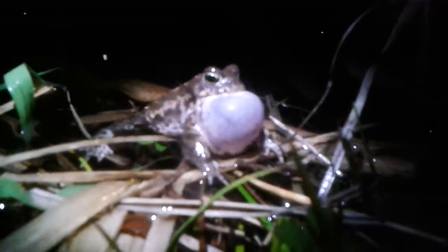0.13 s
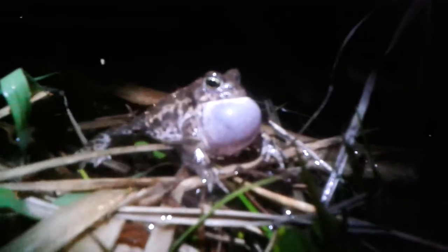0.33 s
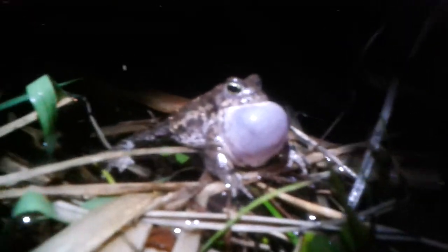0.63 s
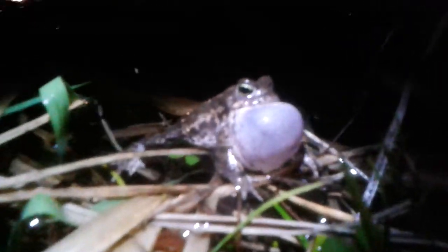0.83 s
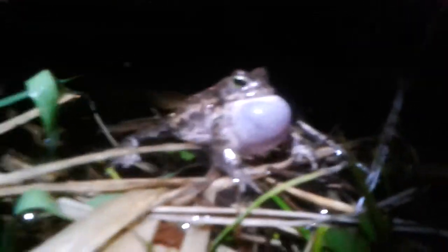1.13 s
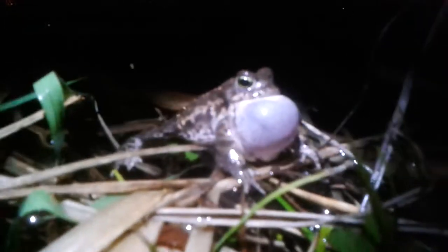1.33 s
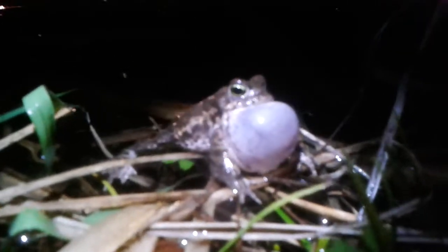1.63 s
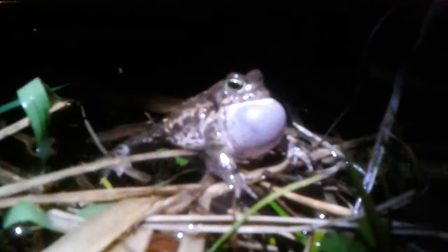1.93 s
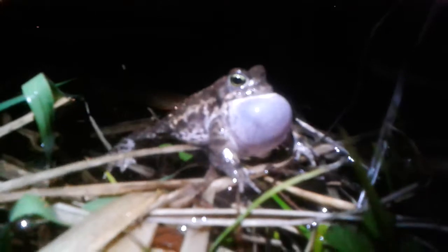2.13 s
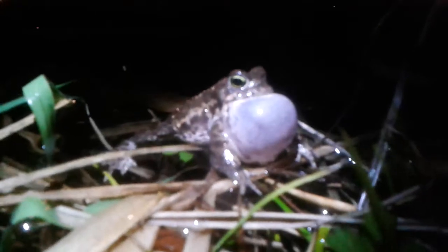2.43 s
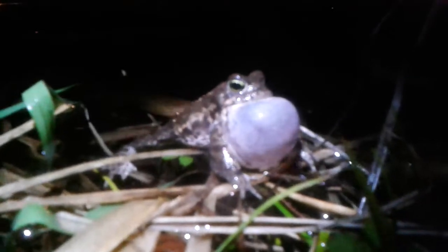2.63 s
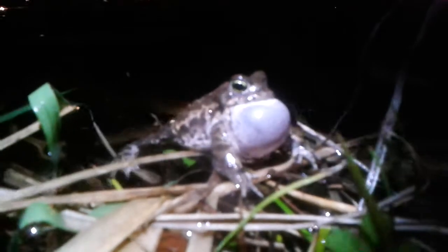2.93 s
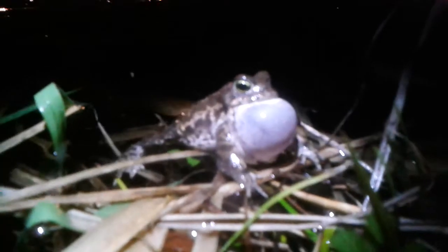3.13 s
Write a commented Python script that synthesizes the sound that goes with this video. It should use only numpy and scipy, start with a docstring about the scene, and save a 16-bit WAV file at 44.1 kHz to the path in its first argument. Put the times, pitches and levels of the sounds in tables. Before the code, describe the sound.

Toad calling in harsh, buzzing rattles very close by at night, with fainter toads filling the pauses.

```python
"""Night at a pond's edge: neighbouring toads call first, over a distant chorus, soft hiss and a faint tone.
Then a toad in the reeds rattles four trills, so close that each pulse overloads the microphone; the last
runs to the end. Every pulse rings its vocal sac, which tightens through a trill: higher, shorter rings.
Neighbours fill the pauses and overlap the trills, a few pulses turn reedy after each of the first three,
and small noise ticks are scattered early, around the first pause and before the last trill."""
import sys
import numpy as np
from scipy import signal
from scipy.fft import rfft, irfft
from scipy.io import wavfile
from scipy.ndimage import uniform_filter1d

SR = 44100
rng = np.random.default_rng(int(sys.argv[2]) if len(sys.argv) > 2 else 0)


def wav_out(sig):
    """Save sig, one row per channel (or a flat mono array), as 16-bit PCM at SR to the path in sys.argv[1]."""
    wavfile.write(sys.argv[1], SR, np.round(np.clip(np.atleast_2d(sig).T, -1, 1) * 32767).astype(np.int16))


N = 144648


def undb(db):
    """Turn decibels into an amplitude factor."""
    return 10 ** (np.asarray(db) / 20)


def curve(points):
    """Join (s, value) points by straight lines."""
    return np.interp(np.arange(N) / SR, *np.array(points).T)


def walk(rate_hz):
    """Slow random drift, spread 1: random steps at this rate, smoothed twice."""
    step = int(SR / rate_hz)
    drift = np.repeat(rng.standard_normal(N // step + 1), step)
    drift = uniform_filter1d(uniform_filter1d(drift, step), step)[:N]
    return drift / drift.std()


def add(out, start_s, sound):
    """Mix a sound in at a given time."""
    i = int(np.clip(round(start_s * SR), 0, N))
    out[i:i + len(sound)] += sound[:N - i]


def band(sound, order, cutoff_hz, kind):
    """Butterworth filter."""
    return signal.sosfilt(signal.butter(order, cutoff_hz, kind, fs=SR, output="sos"), sound)


def sac(hz, attack_s, ring_s, bend_hz, bend_s, octave_db=-np.inf, size=2200):
    """One pulse: the vocal sac swells quickly, settles on its pitch and rings out, almost a sine."""
    t = np.arange(size) / SR
    gliding_hz = hz + bend_hz * np.exp(-t / bend_s)
    phase = 2 * np.pi * (rng.random() + np.cumsum(gliding_hz) / SR)
    swell = (1 - np.exp(-(t / attack_s) ** 2)) * np.exp(-t / ring_s)
    return swell * (np.sin(phase) + undb(octave_db) * np.sin(2 * phase))


# trills of the near toad: start_s, end_s [s, s]
TRILLS = [(.21, .82), (1.05, 1.706), (1.85, 2.6), (2.84, 3.56)]
# its pulses, before filtering and overload: start_s, level_db [s, dB]
NEAR_PULSES = [(0.2194, 10), (0.2477, 11.5), (0.2715, 9.0), (0.293, 8), (0.3174, 7.5), (0.346, 6),
               (0.3829, 9.5), (0.4036, 7.5), (0.4248, 5.5), (0.4483, 6), (0.4775, 7.5), (0.5021, 8.0),
               (0.5256, 8), (0.549, 10), (0.5744, 11), (0.6017, 12), (0.6292, 10.0), (0.649, 11.5),
               (0.6699, 12), (0.6939, 10.0), (0.7255, 13), (0.7439, 14), (0.7623, 10.5), (0.7833, 9.5),
               (0.8127, 11), (1.0538, 13.5), (1.0777, 11.5), (1.0999, 10.5), (1.124, 9.5), (1.1539, 8.5),
               (1.1931, 12.5), (1.2135, 13.0), (1.2334, 12.0), (1.2551, 11), (1.2814, 8.5), (1.3083, 9.5),
               (1.3298, 8.0), (1.3529, 7.5), (1.3813, 6.0), (1.4229, 7.5), (1.4493, 12), (1.4689, 9.5),
               (1.491, 7.5), (1.5187, 10), (1.5378, 11), (1.556, 8.5), (1.5753, 10), (1.5986, 10.5),
               (1.6167, 8), (1.8564, 10), (1.8859, 13.0), (1.912, 11.5), (1.9428, 10), (1.9724, 12.5),
               (2.0014, 9.5), (2.0262, 9), (2.0566, 7.5), (2.0829, 10.5), (2.1127, 9.5), (2.1454, 8.5),
               (2.1795, 10.5), (2.2074, 9.5), (2.2319, 9.5), (2.2593, 10.5), (2.2874, 12), (2.3166, 11.5),
               (2.3374, 10), (2.3602, 11), (2.3895, 11.0), (2.4166, 12.0), (2.4375, 9.5), (2.461, 9.5),
               (2.4964, 12), (2.5177, 12.5), (2.5395, 12), (2.5696, 12.5), (2.5852, 8), (2.8422, 11.5),
               (2.8731, 12.0), (2.9011, 11.0), (2.9383, 9.5), (2.963, 10.5), (2.986, 8), (3.013, 7.5),
               (3.0496, 7.5), (3.0732, 10.5), (3.0977, 11), (3.1218, 9.5), (3.152, 10.5), (3.1949, 11.0),
               (3.2177, 13), (3.2397, 12.0), (3.2635, 12)]
# soft, low pulses as a trill lets go: start_s, level_db [s, dB]
STUTTERS = [(1.622, 4), (1.6276, 0.5), (2.591, 2.5)]
SAC_HZ, RISE_HZ = 1535.5, 63.8  # pitch at the start of a trill, and its rise by the end
ATTACK_S, RING_S = 0.0011, 0.0052  # ring at the start of a trill
TIGHTEN, TIGHTEN_POWER = 0.58, 1.17  # share of the ring lost by the end of a trill, and how late
PITCH_SCATTER_HZ, RING_SCATTER = 5, .06
SCOOP_HZ, SCOOP_S = 83.1, 0.006  # each pulse starts flat and slides up
STUTTER_HZ, STUTTER_RING_S = 1506, 0.0037


def near_toad():
    """Pulses that rise in pitch and shorten through each trill as the sac tightens, no two quite alike."""
    out = np.zeros(N)
    scatter = rng.standard_normal((len(NEAR_PULSES), 2))
    for (start_s, level_db), (tuning, damping) in zip(NEAR_PULSES, scatter):
        trill_start, trill_end = min(TRILLS, key=lambda trill: abs(start_s - np.mean(trill)))
        progress = np.clip((start_s - trill_start) / (trill_end - trill_start), 0, 1)
        tightened = 1 - TIGHTEN * progress ** TIGHTEN_POWER
        ring_s = RING_S * tightened * np.exp(RING_SCATTER * damping)
        hz = SAC_HZ + RISE_HZ * progress + PITCH_SCATTER_HZ * tuning
        add(out, start_s, undb(level_db) * sac(hz, ATTACK_S, ring_s, -SCOOP_HZ, SCOOP_S))
    for start_s, level_db in STUTTERS:
        pulse = sac(STUTTER_HZ, ATTACK_S, STUTTER_RING_S, -SCOOP_HZ, SCOOP_S)
        add(out, start_s, undb(level_db) * pulse)
    return out


# loudest plain pulses of the neighbours: start_s, level_db, pitch_hz (mean of the slide) [s, dB, Hz]
NEIGHBOUR_PULSES = [(0.021, -1, 1517), (0.041, 3.5, 1595), (0.058, 3, 1550), (0.078, 1, 1613),
                    (0.084, -1, 1635), (0.096, -5, 1730), (0.106, 0, 1510), (0.111, 2.5, 1663),
                    (0.128, 3.0, 1660), (0.143, 3.5, 1670), (0.15, 2, 1590), (0.156, -4.5, 1740),
                    (0.163, 4, 1640), (0.172, 2, 1560), (0.188, 3, 1730), (0.212, 3.5, 1517),
                    (0.215, -13, 1780), (0.235, 3.0, 1607), (0.642, -2, 1680), (0.658, -0.5, 1615),
                    (0.677, -10, 1650), (0.808, -2, 1550), (0.828, -4.0, 1680), (0.862, 0, 1610),
                    (0.888, -6, 1750), (0.909, 2, 1600), (0.95, 2, 1590), (0.964, -2.5, 1656),
                    (0.973, 0.5, 1590), (0.982, -1.5, 1730), (1.0, -8, 1710), (1.016, -3.5, 1690),
                    (1.04, -6, 1620), (1.175, -5.5, 1720), (1.208, 2, 1655), (1.227, 1.5, 1604),
                    (1.247, -6, 1596), (1.298, 0, 1630), (1.368, -7.5, 1646), (1.396, -2.5, 1620),
                    (1.415, 1, 1610), (1.438, -4, 1730), (1.498, -1, 1650), (1.742, 3.5, 1590),
                    (1.756, 5, 1675), (1.762, 1, 1625), (1.778, 2.5, 1500), (1.787, 4.5, 1620),
                    (1.794, -1.5, 1510), (1.801, -1.5, 1597), (1.807, 3.0, 1639), (1.813, 4.0, 1574),
                    (1.82, -3, 1490), (1.831, -9, 1680), (1.839, 4.5, 1573), (1.849, 6, 1630),
                    (1.871, 7, 1666), (1.883, 0, 1630), (1.906, -2, 1590), (1.924, 4.5, 1580),
                    (1.936, -1, 1650), (1.94, 2, 1633), (1.963, 5, 1680), (1.993, -6, 1640),
                    (2.037, -6.5, 1560), (2.052, -6, 1670), (2.075, -4.5, 1590), (2.276, -5, 1600),
                    (2.347, -3, 1650), (2.383, 1, 1660), (2.402, -4, 1630), (2.492, 1, 1670),
                    (2.51, -4.0, 1660), (2.563, 0.5, 1650), (2.598, -0.5, 1630), (2.632, 2.5, 1570),
                    (2.655, 3, 1653), (2.674, 0, 1590), (2.699, -1.5, 1600), (2.717, -3.5, 1650),
                    (2.722, -1.5, 1586), (2.735, -2.5, 1640), (2.748, -2.5, 1590), (2.754, -2, 1610),
                    (2.771, 4, 1605), (2.791, 0.5, 1620), (2.799, -1.5, 1555), (2.817, 3, 1650),
                    (2.83, -2.5, 1620), (2.862, -1, 1603), (2.888, 2, 1600), (2.921, 0.5, 1650),
                    (2.976, -4.5, 1670), (3.06, -5, 1690), (3.17, -0.5, 1740), (3.182, -2, 1650)]
# reedy pulses just after near trills, with a clearer octave: start_s, level_db, pitch_hz [s, dB, Hz]
REEDY_PULSES = [(.853, -2, 1586), (.871, 1, 1646), (.892, 1, 1600), (.921, 1, 1627), (.93, 3, 1646),
                (1.771, 3.5, 1586), (2.618, 0.5, 1624), (2.639, 1, 1630), (2.661, -4, 1620),
                (2.689, -0.5, 1627)]
NEIGHBOUR_ATTACK_S, NEIGHBOUR_RING_S = 0.0013, 0.0028
NEIGHBOUR_OCTAVE_DB, REEDY_OCTAVE_DB = -39, -24
# pulses start sharp and settle below their mean pitch
NEIGHBOUR_SAG_HZ, NEIGHBOUR_SAG_S, NEIGHBOUR_SETTLE_HZ = 152, 0.0015, 50.2


def soft_pulses():
    """Short sac pulses: plain ones from toads a little way along the bank, and a few reedy ones."""
    out = np.zeros(N)
    voices = [(NEIGHBOUR_PULSES, NEIGHBOUR_OCTAVE_DB), (REEDY_PULSES, REEDY_OCTAVE_DB)]
    for pulses, octave_db in voices:
        for start_s, level_db, pitch_hz in pulses:
            pulse = sac(pitch_hz - NEIGHBOUR_SETTLE_HZ, NEIGHBOUR_ATTACK_S, NEIGHBOUR_RING_S,
                        NEIGHBOUR_SAG_HZ, NEIGHBOUR_SAG_S, octave_db)
            add(out, start_s, undb(level_db) * pulse)
    return out


REEDS_DB, REEDS_DELAY_S, REEDS_T60_S = -13.5, .005, 0.067


def reeds(calls, size=4000):
    """The softer pulses arrive with a short, soft scatter off the reeds."""
    tail = rng.standard_normal(size) * undb(-60 * np.arange(size) / SR / REEDS_T60_S)
    scatter = np.zeros(N)
    add(scatter, REEDS_DELAY_S, signal.fftconvolve(calls, tail / np.linalg.norm(tail)))
    return calls + undb(REEDS_DB) * scatter


# toads farther off, before scatter: pitch_hz, pulse_rate_hz [Hz, pulses per s]
CHORUS_TOADS = [(1550, 38), (1655, 49), (1715, 58), (1690, 41)]
# level of those toads together: time_s, level_db [s, dB]
CHORUS_LEVEL = [(0, -13.5), (.2, -10.5), (.35, -12), (.45, -45), (.57, -26), (.66, -14.5), (.87, -11),
                (1.02, -16.5), (1.13, -49), (1.22, -13), (1.6, -15), (1.65, -20), (1.729, -27), (1.78, -10),
                (2.2, -19.5), (2.7, -16), (3.28, -16)]
CHORUS_RING_S, CHORUS_OCTAVE_DB = .0035, -30.5
CHORUS_JITTER, CHORUS_SCATTER_DB = .2, 2.0  # unevenness of the gaps (log spread) and of the levels


def chorus(count=200):
    """Farther toads, each rattling its sac unevenly around its own pitch and rate."""
    out = np.zeros(N)
    for pitch_hz, pulse_rate_hz in CHORUS_TOADS:
        chance = rng.standard_normal((count, 3))
        gaps = np.exp(CHORUS_JITTER * chance[:, 0])
        times = (np.cumsum(gaps) - rng.random()) / pulse_rate_hz
        for start_s, (_, strength, tuning) in zip(times, chance):
            pulse = sac(pitch_hz * (1 + 0.024 * tuning), NEIGHBOUR_ATTACK_S, CHORUS_RING_S,
                        NEIGHBOUR_SAG_HZ, NEIGHBOUR_SAG_S, CHORUS_OCTAVE_DB)
            add(out, start_s, undb(CHORUS_SCATTER_DB * np.clip(strength, -2, 2)) * pulse)
    return out * curve([(s, undb(db)) for s, db in CHORUS_LEVEL])


RADIATE_HZ = 1185  # a sac this small radiates little below this
RASP_DB, RASP_LOW_HZ, RASP_HIGH_HZ = -30.5, 2740, 4060
RASP_FULL = 0.86  # call amplitude above which the rasp grows no further


def radiate(calls):
    """The small bodies shed the lows, and a faint noise rasp follows the strength of the calls."""
    calls = band(calls, 5, RADIATE_HZ, "high")
    rasp = band(rng.standard_normal(N), 4, [RASP_LOW_HZ, RASP_HIGH_HZ], "band")
    strength = np.minimum(np.abs(signal.hilbert(calls)), RASP_FULL)
    return calls + undb(RASP_DB) * rasp / rasp.std() * strength


# small ticks in the wet reeds, before band-pass and doubling: start_s, level_db [s, dB]
TICKS = [(.0098, -29.5), (0.0705, -22), (0.099, -24), (0.1571, -26), (0.956, -36), (1.043, -26),
         (2.714, -34.5), (2.783, -33)]
TICK_S, TICK_LOW_HZ, TICK_HIGH_HZ = 0.0034, 2100, 6800  # decay time and band


def ticks(size=600):
    """Dry, bright clicks: band-passed noise that dies away within milliseconds."""
    out = np.zeros(N)
    fade = np.exp(-np.arange(size) / SR / TICK_S)
    for start_s, level_db in TICKS:
        add(out, start_s, undb(level_db) * fade * rng.standard_normal(size))
    return 2 * band(out, 2, [TICK_LOW_HZ, TICK_HIGH_HZ], "band")


# relative colour of night air and the blur of the far chorus: pitch_hz, level_db [Hz, dB]
AIR_COLOUR = [(25, -19), (60, -14), (150, -12), (400, -8), (750, -1), (1100, -3), (1350, 1), (1620, 7),
              (1950, -7), (2500, -18), (3300, -14), (4500, -30), (8000, -32)]
AIR_DB, AIR_WAVER_DB, AIR_TOP_HZ = -38, 1.0, 8000


def air():
    """Soft wavering noise, coloured with a hump where the far toads blur together."""
    hz, level_db = np.array(AIR_COLOUR).T
    bins_hz = np.fft.rfftfreq(N, 1 / SR)
    colour = undb(np.interp(np.log(bins_hz + 1), np.log(hz), level_db))
    wash = irfft(rfft(rng.standard_normal(N)) * colour, N)
    wash = band(wash, 2, AIR_TOP_HZ, "low")
    return wash / wash.std() * undb(AIR_DB + AIR_WAVER_DB * walk(8.5))


# peak level of the faint tone: time_s, level_db [s, dB]
TONE_LEVEL = [(0, -48), (.85, -66), (.93, -44), (1.03, -38), (1.12, -63), (1.58, -60), (1.68, -41),
              (1.85, -39.5), (1.95, -59), (2.2, -46.5), (2.5, -61), (2.68, -43.5), (2.9, -50.5),
              (3.28, -51)]
TONE_HZ, TONE_DRIFT_HZ = 643, 0.88


def faint_tone():
    """A sine of nearly steady pitch that comes and goes in level."""
    hz = TONE_HZ + TONE_DRIFT_HZ * walk(7.3)
    return np.sin(2 * np.pi * np.cumsum(hz) / SR) * undb(curve(TONE_LEVEL))


HISS_LOW_HZ, HISS_HIGH_HZ, HISS_TRILL_DB = 4500, 12600, -53
HISS_AT_S, HISS_WIDTH_S, HISS_DB = 1.7, 0.017, -49.5  # the brief swell


def hiss():
    """Faint band-passed treble noise lies under the trills and swells briefly as the second one ends."""
    t = np.arange(N) / SR
    noise = band(rng.standard_normal(N), 2, [HISS_LOW_HZ, HISS_HIGH_HZ], "band")
    trilling = sum(1. * ((t > start) & (t < end)) for start, end in TRILLS)
    trilling = uniform_filter1d(trilling, size=1500)  # soft edges
    swell = np.exp(-((t - HISS_AT_S) / HISS_WIDTH_S) ** 2)
    return noise / noise.std() * (undb(HISS_TRILL_DB) * trilling + undb(HISS_DB) * swell)


def scene():
    """All the toads through their small bodies, over the ticks and the night background."""
    toads = radiate(near_toad() + reeds(soft_pulses()) + chorus())
    return (toads + ticks() + air() + faint_tone() + hiss())[None]


CLIP_LEVEL, TOP_HZ = 0.69, 16000


def record(dry):
    """Hard clipping at the input gives the near pulses buzzing odd harmonics; then the top is cut."""
    at_48k = signal.resample_poly(dry, 160, 147, axis=-1)  # the input clips at 48 kHz
    clipped = np.clip(at_48k, -CLIP_LEVEL, CLIP_LEVEL)
    back = signal.resample_poly(clipped, 147, 160, axis=-1)[:, :N]
    top_cut = signal.firwin(201, TOP_HZ, fs=SR)[None]
    return signal.fftconvolve(back, top_cut, "same", axes=-1)


dry = scene()
out = record(dry)
wav_out(out)
```